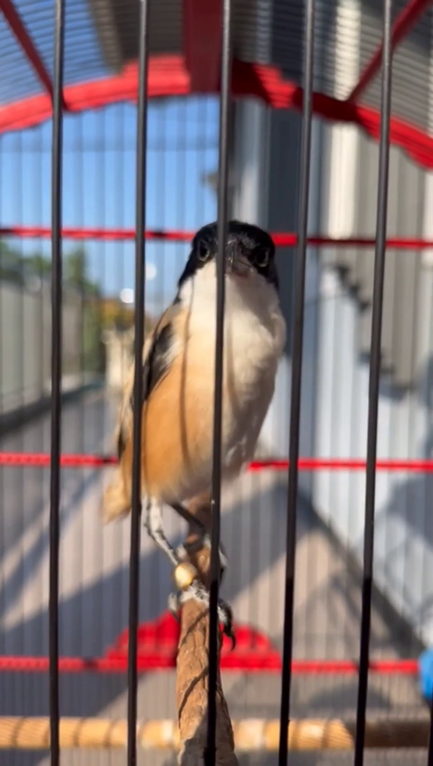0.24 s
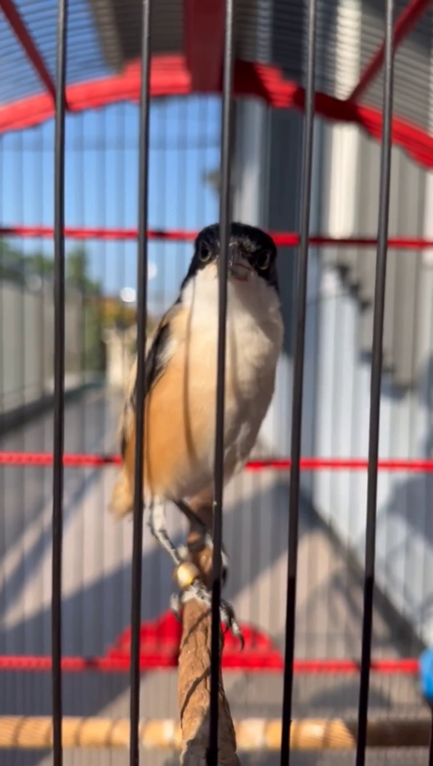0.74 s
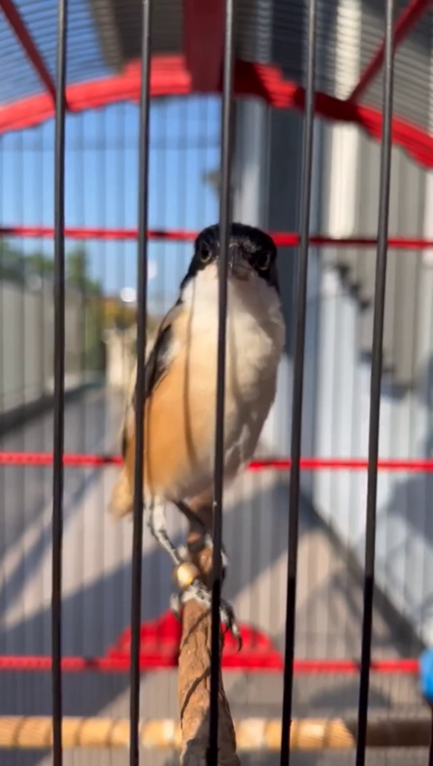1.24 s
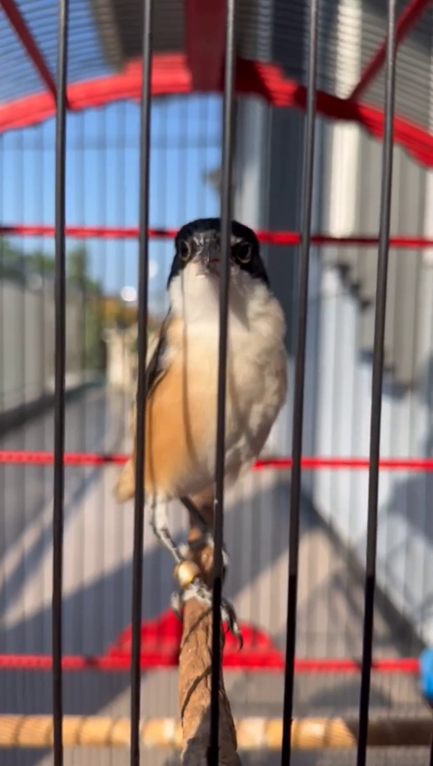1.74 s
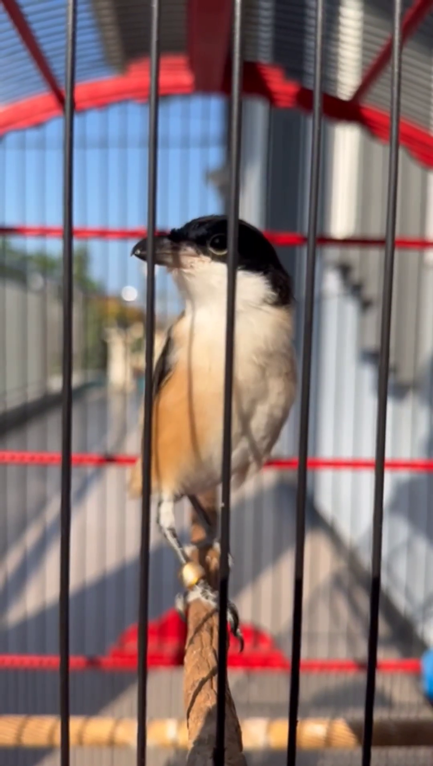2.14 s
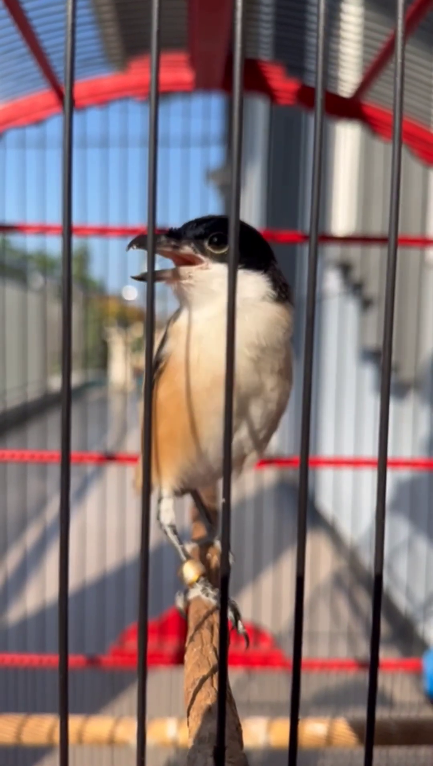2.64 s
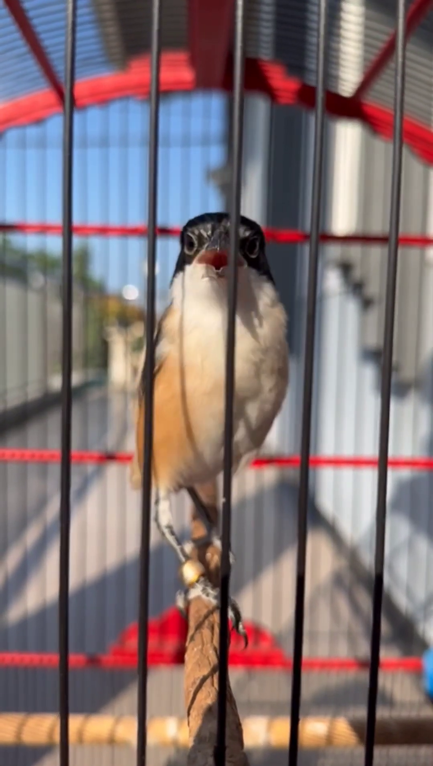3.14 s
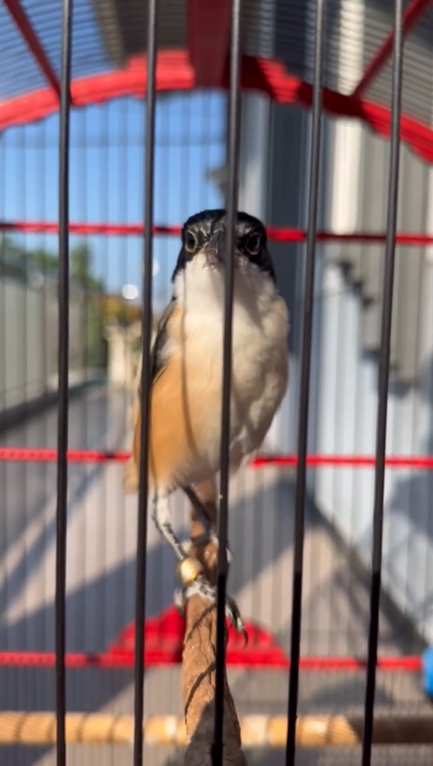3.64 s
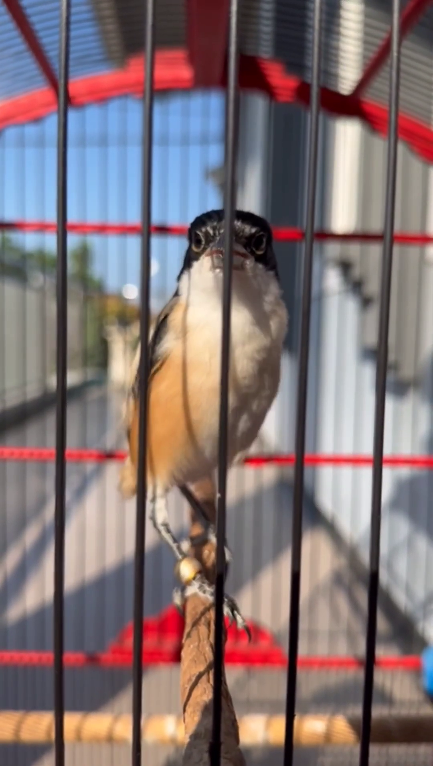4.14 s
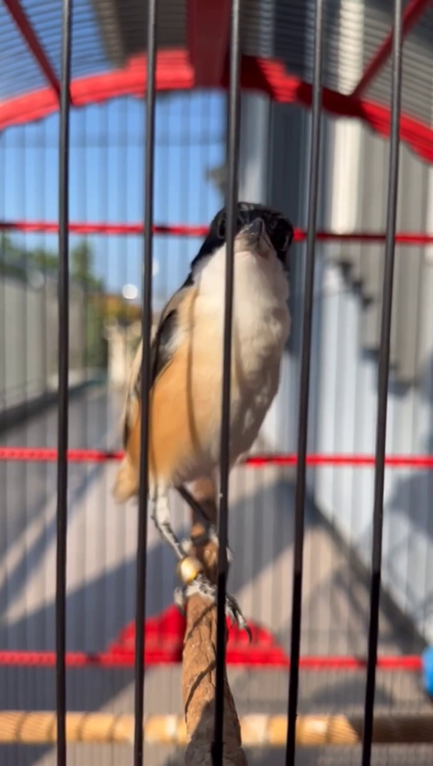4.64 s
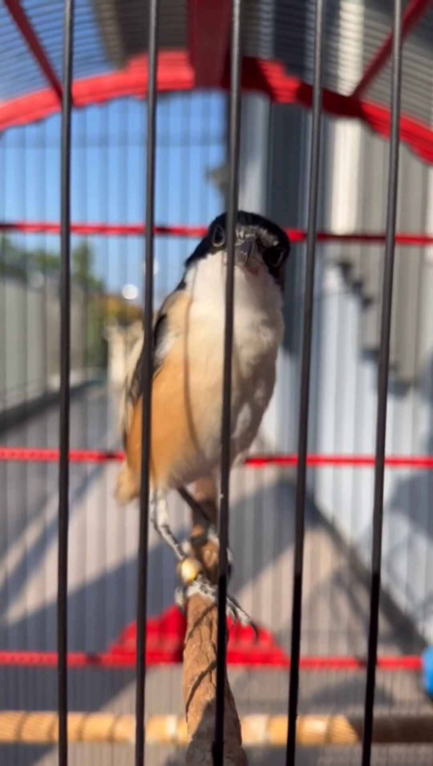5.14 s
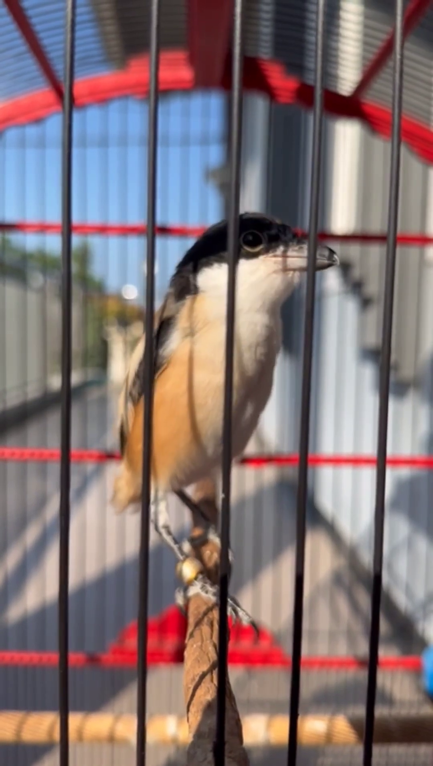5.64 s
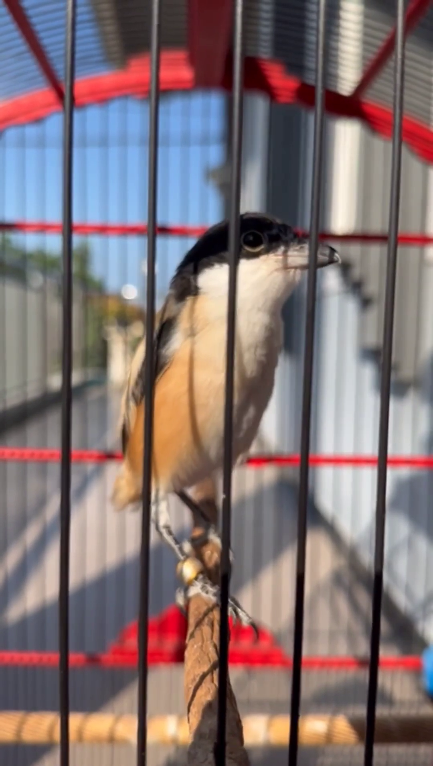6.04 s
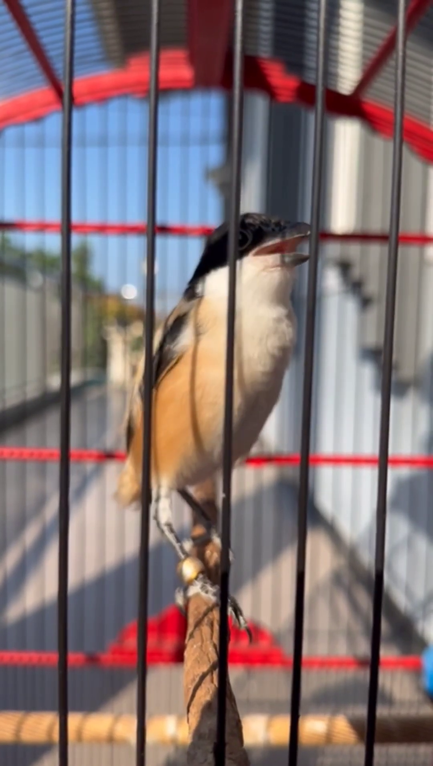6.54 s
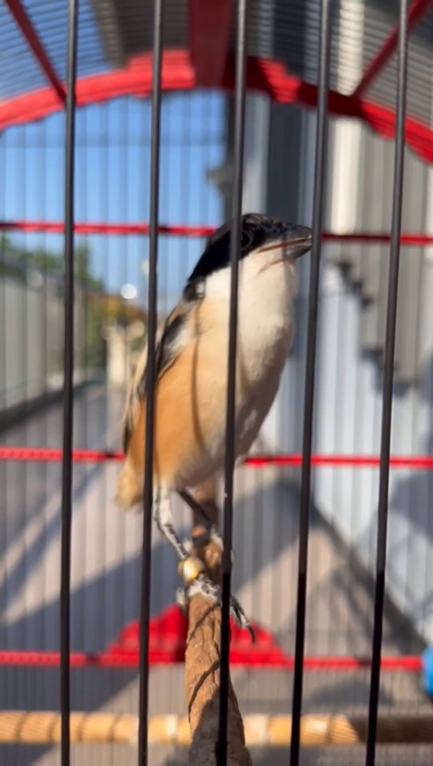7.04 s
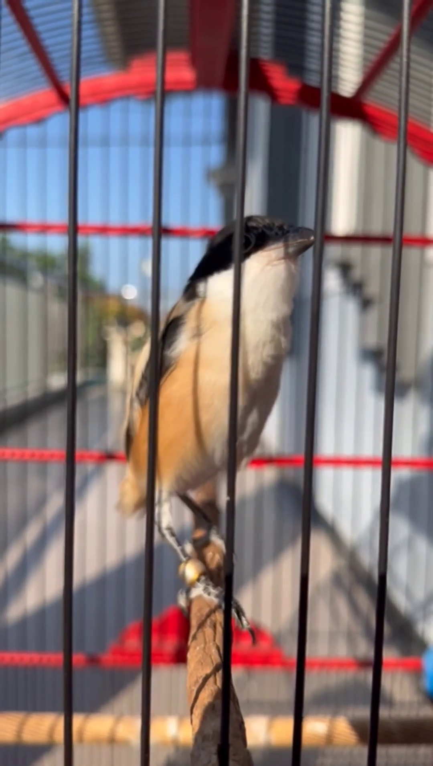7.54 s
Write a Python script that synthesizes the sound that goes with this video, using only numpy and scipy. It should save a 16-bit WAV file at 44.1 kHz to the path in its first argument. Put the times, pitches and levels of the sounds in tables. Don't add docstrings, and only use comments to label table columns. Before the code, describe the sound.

Loud, bright, scratchy chips and buzzy rasping notes from one perched songbird on a roof terrace, with distant traffic and faint far birds.

```python
import sys
import numpy as np
from scipy import signal
from scipy.fft import rfft, irfft, next_fast_len
from scipy.io import wavfile
from scipy.ndimage import uniform_filter1d

SR = 44100
rng = np.random.default_rng(int(sys.argv[2]) if len(sys.argv) > 2 else 0)


def waveform_to_disk(signal):
    frames = np.transpose(np.atleast_2d(signal))
    scaled = np.clip(frames, -1, 1) * 32767
    samples = np.round(scaled).astype(np.int16)
    wavfile.write(sys.argv[1], SR, samples)


def elevation(decibels):
    levels = np.asarray(decibels, float)
    return 10 ** (levels / 20)


N = 343980


def evened(x):
    return x / np.sqrt(np.mean(x ** 2) + 1e-20)


def read(points, hz):
    f, value = np.transpose(points)
    return np.interp(np.log(hz + 1), np.log(f + 1), value)


def colour(x, points):
    size = next_fast_len(x.shape[-1], True)
    gain = elevation(read(points, np.fft.rfftfreq(size, 1 / SR)))
    return irfft(rfft(x, size) * gain, size)[..., :x.shape[-1]]


def wander(chance, seconds):
    size = max(int(seconds * SR), 1)
    return evened(uniform_filter1d(uniform_filter1d(chance, size), size))


def add(mix, s, sound):
    sound = sound[max(-round(s * SR), 0):]
    part = mix[max(round(s * SR), 0):][:len(sound)]
    part += sound[:len(part)]


def traffic():
    # f/Hz, level/dB
    floor = [(25, -57), (45, -14.5), (65, 2), (115, -2), (160, -11), (650, -25), (950, -29.5), (3700, -40),
             (11000, -64.5)]
    # f/Hz, level/dB
    port_side = [(60, -41.5), (250, -20), (700, -12.5), (10000, -9)]
    # t/s, level/dB
    swell = [
        (0, -45),
        (.6, -47),
        (2.301, -47.5),
        (2.802, -42.5),
        (4.299, -44.5),
        (6.201, -46.5),
        (7.8, -46.5),
    ]
    frames, hz = N // 512 + 5, np.fft.rfftfreq(2048, 1 / SR)
    a, b, c, d, patches = rng.standard_normal((frames, 1025, 5)).T
    patches = evened(uniform_filter1d(uniform_filter1d(patches, 6, 0), 10, 1))
    level_db = np.interp(np.arange(frames) * 512 / SR, *np.transpose(swell))
    mean_db = level_db.mean()
    follow = read([(400, 1.0), (1500, 0.61)], hz)[:, None]
    z = np.array([a + 1j * b, (c + 1j * d) * elevation(read(port_side, hz))[:, None]])
    z *= elevation(read(floor, hz)[:, None] + 2.5 * patches + follow * (level_db - mean_db))
    x = signal.istft(z, nperseg=2048, noverlap=1536)[1][:, :N]
    return elevation(mean_db + 1.7) * x / np.sqrt(np.mean(x[0] ** 2))


def shaped(shape, start, length, hz, db):
    return [(start + share * length, ratio * hz, tone_db + db, rasp_db + db)
            for share, ratio, tone_db, rasp_db in shape]


def clear_tone(hz, rough, beak, a, b):
    # f/Hz, level/dB
    throat = [(700, -17), (1500, -9.5), (3300, 0), (4200, 3.5), (5100, -7), (5700, -7.5), (6400, -15),
              (12000, -23.5)]
    k = np.arange(1, 9)[:, None]
    upper = np.maximum(k - 2, 0)
    turns = np.cumsum(hz * (1 + 0.0078 * wander(a, 0.0019))) / SR
    slack = np.clip(.5 - np.gradient(np.log(hz)) * SR / 8, 0, 1)
    weights = elevation(read(throat, k * hz / beak) - (4.7 * rough + 3.2 * slack) * upper) * (k * hz < SR / 2)
    weights = weights / np.sqrt((weights ** 2).sum(0) / 2)
    flutter = elevation((1.92 + 2.3 * rough) * np.array([wander(v, 0.0013) for v in b]))
    blur = (0.072 + .5 * rough) * upper * np.array([wander(v[::-1], .0011) for v in b])
    patches = elevation(1.5 * np.minimum(upper, 2) * np.array([wander(v, .008) for v in b[::-1]]))
    return (weights * np.cos(2 * np.pi * (k * turns + a[-8:, None]) + blur) * flutter * patches).sum(0)


def chaotic_rasp(hz, beak, c, d):
    # f/Hz, level/dB
    ridges = [(700, -23.5), (1600, -25), (2600, 5), (3200, -7), (4100, 2.5), (5600, -13.5), (9000, -21),
              (10200, -41.5)]
    # f/Hz, level/dB
    beak_bright = [(2600, -10), (4500, -9.5), (6000, 33), (9000, 48), (11000, 62)]
    half_step_db, half_step_below_hz = -4.1, 1480
    k = np.arange(1, 9)[:, None]
    chaos = np.cumsum(hz * np.exp(.2 * np.tanh(wander(c, .0013)))) / SR
    beats = np.sin(2 * np.pi * (k * chaos + c[-8:, None])).sum(0) / 2
    if hz.max() < half_step_below_hz:
        half = np.cumsum(hz / 2 * (1 + 0.022 * wander(c[::-1], .002))) / SR
        halves = np.cos(2 * np.pi * ((2 * k - 1) * half + d[-8:, None])).sum(0) / 2
        beats = beats + elevation(half_step_db) * halves
    opened = [(f * beak ** (.6 * (f > 3000)), db) for f, db in ridges]
    tilt = [(f, db * (beak - 1)) for f, db in beak_bright]
    return evened(colour(colour(beats + .25 * d, opened), tilt) * elevation(2 * wander(d[::-1], .0008)))


def note(rows, beak):
    s, hz, tone_db, rasp_db = np.transpose(rows)
    t = np.arange(s[0], s[-1] + .009, 1 / SR)
    hz = uniform_filter1d(np.interp(t, s, hz), 60 + len(t) // 30)
    tone_size, rasp_size = (elevation(uniform_filter1d(np.interp(t, s, db), 60)) for db in (tone_db, rasp_db))
    a, c, d, *b = rng.standard_normal((11, len(t)))
    rough = rasp_size ** 2 / (tone_size ** 2 + rasp_size ** 2)
    sound = tone_size * clear_tone(hz, rough, beak, a, b) + rasp_size * chaotic_rasp(hz, beak, c, d)
    return s[0], sound * signal.windows.tukey(len(t), 700 / len(t))


def harsh_syllables():
    # share of length, pitch ratio, tone level/dB, rasp level/dB
    churr_shape = [(0, .65, -43, -22), (.19, .72, -13, -10.5), (.28, .995, -4.5, -18),
                   (.55, 1.005, -1.5, -22.5), (.63, 1.045, 0, -14), (.7, 1.02, -10, -4),
                   (.88, .9, -17.5, -7), (1, .8, -23.5, -17.5)]
    churr_arch_shape = [(0, .6, -36, -14.5), (.2, .75, -10.5, -13), (.3, .95, -1.5, -16),
                        (.5, 1.0, -2, -16), (.62, 1.06, -2, -8), (.85, 1.01, -4, -6), (1, .97, -14, -12.5)]
    churr_swell_shape = [(0, .65, -40, -25), (.2, .75, -14, -12), (.27, .98, -3, -11),
                         (.33, .99, -7.5, -19.5), (.6, 1.03, 0, -15.5), (.68, 1.05, -8, -5),
                         (.85, .9, -17.5, -9), (1, .8, -25, -18)]
    churr_burst_shape = [(0, .65, -36.5, -21), (.2, 0.89, -12, -12), (.32, 1, -4, -18.5),
                         (.53, 0.98, -7, -19.5), (.6, 1.04, 2, -11), (.68, 1.04, -9.5, -2.5),
                         (.88, 0.98, -16, -4.5), (1, 0.92, -25.5, -21)]
    arch_shape = [(0, 0.54, -26, -17.5), (.12, .58, -16.5, -13.5), (.2, .8, -5.5, -8.5),
                  (.33, .88, -6, -10), (.5, 0.98, 2.5, -4.5), (.78, .93, -10, -1), (1, .76, -8.5, -6.5)]
    long_arch_shape = [(0, 0.49, -35, -22.5), (.15, .65, -18.5, -12), (.2, .75, -6, -4.5),
                       (.26, .86, -10, -12.5), (.36, .9, -2.5, -12), (.48, 1.01, 0.5, -7.5),
                       (.75, .92, -10.5, -4.5), (1, .8, -7, -6)]
    step_shape = [(0, .6, -29, -19.5), (.13, .7, -20, -9), (.27, .86, -7.5, -2), (.4, .93, -4, -10.5),
                  (.6, 0.98, .5, -5), (.78, 0.98, -6, -0.5), (1, .78, -11.5, -5.5)]
    plateau_shape = [(0, .76, -19, -6.5), (.16, .94, -4.5, -1.5), (.35, 0.93, -1, -6), (.6, 0.97, -4.5, -8),
                     (.85, .9, -8.5, -3), (1, 0.85, -17, -15.5)]
    long_plateau_shape = [(0, .76, -18.5, -4.5), (.16, .92, -3.5, -3), (.33, 0.96, 1.5, -5.5),
                          (.6, 0.98, -3.5, -9), (.78, .93, -5, -11), (1, 0.89, -28, -22)]
    buzz_shape = [(0, .98, -3.5, 0), (.35, 1.02, -8, 0.5), (.8, .85, -9.5, -0.5), (1, .75, -14, -19.5)]
    warble_shape = [(0, 0.6, -26, -24.5), (.2, .88, -17.5, -24), (.5, 1.0, 0.5, -13.5), (.76, .9, -12, -18),
                    (1, 0.46, -25, -33)]
    ramp_shape = [(0, 0.5, -28, -18.5), (.2, .8, -9.5, -19), (.4, .93, -2, -11.5), (.54, 0.98, 0, -5),
                  (.75, 0.96, -9, -8.5), (1, .78, -35, -29.5)]
    dome_shape = [(0, .72, -47.5, -21), (.22, .89, -14, -23.5), (.52, 0.97, 1, -9.5), (.8, .98, -7.5, -10),
                  (1, 0.66, -30, -32)]
    # start t/s, length t/s, pitch f/Hz, level/dB, beak opening (ratio)
    churrs = [
        (0.458, 0.088, 1500, -14.5, 1.06),
        (5.882, 0.077, 1795, -18, 1.11),
        (7.094, 0.071, 1520, -18, 1.19),
    ]
    churr_arches = [(0.017, .068, 1474, -13.5, 1.094)]
    churr_swells = [(0.367, 0.086, 1683, -15, 0.99)]
    churr_bursts = [(.545, .075, 1437, -12, 1.147)]
    arches = [(6.928, .092, 1911, -22.5, 0.97), (7.62, .105, 1914, -21.5, 1.01)]
    long_arches = [(1.78, .132, 1954, -17, 0.94)]
    steps = [(6.153, .09, 1796, -24.5, 0.87)]
    plateaus = [(7.018, .085, 1790, -20, 0.93)]
    long_plateaus = [(6.241, .15, 1806, -24.5, 0.98)]
    buzzes = [
        (6.315, .07, 1560, -29, 1.24),
        (-.025, .06, 1420, -23, 1.01),
        (.071, 0.049, 1471, -23, 1.056),
        (1.913, 0.11, 1435, -22.5, 0.97),
        (7.727, 0.1, 1416, -25, 1.01),
    ]
    warbles = [(4.418, .082, 2184, -14, 1.055)]
    ramps = [(4.561, .082, 2098, -18.5, 1.055), (4.711, .075, 2170, -15.5, 1.01)]
    domes = [(5.007, 0.092, 2221, -16.5, 1.14), (5.207, 0.082, 2192, -18, 1.06),
             (5.456, 0.086, 2171, -16.5, 1.245), (5.693, 0.08, 2114, -15.5, 1.01)]
    sung = np.zeros(N)
    for shape, rows in ((churr_shape, churrs), (churr_arch_shape, churr_arches),
                        (churr_swell_shape, churr_swells), (churr_burst_shape, churr_bursts),
                        (step_shape, steps), (long_plateau_shape, long_plateaus),
                        (arch_shape, arches), (long_arch_shape, long_arches),
                        (plateau_shape, plateaus), (buzz_shape, buzzes),
                        (warble_shape, warbles), (ramp_shape, ramps), (dome_shape, domes)):
        for *syllable, beak in rows:
            add(sung, *note(shaped(shape, *syllable), beak))
    return sung


def walls(x):
    # f/Hz, t60 t/s
    decay = [(1500, 0.34), (4400, 0.29), (7000, 0.43), (10000, 0.29)]
    # f/Hz, level/dB
    near_wall = [(2500, 2.5), (5000, -1.5), (7000, 3.5), (9500, 0)]
    taps = np.zeros((2, SR))
    at = np.arange(260, SR - 20, 20) + rng.integers(0, 20, (2, (SR - 261) // 20))
    np.put_along_axis(taps, at, rng.choice([-1., 1.], at.shape), 1)
    hz, t, z = signal.stft(taps, SR, nperseg=256)
    quick = elevation(read(near_wall, hz)[:, None] - 60 * t / 0.083)
    late = elevation(-14.5 - 60 * t / read(decay, hz)[:, None])
    tail = signal.istft(z * (quick + late), SR, nperseg=256)[1]
    return signal.fftconvolve(x[None], tail / np.linalg.norm(tail[0]), axes=1)[:, :N]


def fuzzy_tones(rows):
    out = np.zeros(N)
    for s, length, start_hz, end_hz, width, db in rows:
        size = int(length * SR)
        a, b = rng.standard_normal((2, size))
        fuzz = wander(a, 0.51 / width) + 1j * wander(b, 0.51 / width)
        turns = np.cumsum(np.linspace(start_hz, end_hz, size)) / SR
        tone = (fuzz * np.exp(2j * np.pi * turns)).real
        add(out, s, elevation(db) * tone * signal.windows.tukey(size, .6))
    return out


def far_birds():
    # start t/s, length t/s, start f/Hz, end f/Hz, bandwidth f/Hz, level/dB
    calls = [
        (0.191, .045, 1200, 1107, 150, -60),
        (4.318, 0.033, 1300, 1300, 120, -56),
        (6.62, 0.24, 2840, 2866, 130, -58.5),
        (6.83, 0.22, 3530, 4290, 735, -56.5),
        (7.17, .13, 3346, 3200, 400, -52.5),
        (7.35, 0.23, 3260, 3080, 171, -52),
        (7.501, 0.18, 5970, 5620, 3330, -56),
    ]
    return fuzzy_tones(calls)


def chips():
    # share of length, pitch ratio, tone level/dB, rasp level/dB
    flat_shape = [(0, .76, -46, -24), (.3, .84, -24.5, -22), (.45, 1.0, -7.5, -20), (.9, 1.0, -3, -15),
                  (1, 1.0, -6.5, -10.5)]
    cap_shape = [(0, .74, -30.5, -26), (.3, 0.92, -9, -16.5), (.5, 0.98, -1, -14.5), (.8, .98, -2, -14),
                 (1, .84, -9.5, -14)]
    rise_shape = [(0, .78, -45.5, -32), (.3, .85, -16, -23.5), (.5, .93, -4.5, -23), (.82, 1.0, -2, -17.5),
                  (1, 0.89, -13, -7)]
    sag_shape = [(0, 1.03, -34, -34), (.28, 1.03, -9.5, -16.5), (.7, 1.0, -1, -12), (1, .88, -10.5, -7)]
    level_shape = [(0, 1.01, -30, -32), (.18, 1.01, -7.5, -19), (.7, 1.0, -2, -13), (.85, .97, -5.5, -8.5),
                   (1, .85, -11, -6.5)]
    drop_shape = [(0, 2, -38, -31), (.3, 1.4, -8, -20), (.68, 1.15, -1, -2), (.88, 1.02, -1, -10),
                  (1, 1.0, -15, -10)]
    # start t/s, pitch f/Hz, level/dB, beak opening (ratio)
    flats = [(0.736, 2192, -7, 1.47), (1.186, 2207, -8, 1.44)]
    caps = [(6.56, 2408, -15.5, 1.38), (7.295, 2374, -18.5, 1.5)]
    rises = [(.961, 2265, -7, 1.49), (1.411, 2280, -7.5, 1.49), (2.201, 2439, -12, 1.38),
             (2.663, 2527, -10, 1.43), (2.912, 2596, -10.5, 1.45)]
    sags = [(4.16, 2500, -11, 1.327)]
    levels = [(2.446, 2500, -11.5, 1.5)]
    drops = [(3.17, 2375, -11, 1.57), (3.317, 2380, -12.5, 1.51), (3.461, 2508, -15.5, 1.24),
             (3.615, 2160, -18.5, 1.13), (3.809, 2172, -15, 1.26), (3.97, 2159, -17, 1.34)]
    # share of length, pitch ratio, tone level/dB, rasp level/dB
    leap_shape = [(.13, 0.93, 2, -3.5), (.32, 0.99, -2.5, -6.5), (.55, 0.57, -21, -10.5),
                  (1, 0.57, -39.5, -26.5)]
    spike_shape = [(.3, 1.0, -16.5, 1.5), (.68, .55, -15.5, -6.5), (1, .55, -40, -21.5)]
    hook_shape = [(.12, 1.03, -2, -12.5), (.3, 1.0, 1.5, -16), (.62, .98, -6, -26), (.8, .93, -17, -27.5),
                  (1, 0.74, -40, -37)]
    wobble_shape = [(.14, 1.02, -1.5, -3.5), (.28, .98, -1, -6), (.4, .82, -13, -6), (.58, 1.04, -10, -9),
                    (1, .75, -37.5, -23)]
    # start t/s, length t/s, pitch f/Hz, level/dB
    leaps = [(0.77, 0.036, 3063, -13.5), (1.221, 0.034, 3074, -14), (2.237, 0.035, 3195, -16),
             (6.592, .035, 3028, -20), (7.332, .03, 2682, -26)]
    spikes = [(.993, 0.027, 3583, -10.5), (1.442, .03, 3725, -13.5)]
    hooks = [(2.686, 0.017, 3968, -16), (2.943, 0.028, 4410, -11.5), (3.196, 0.027, 4787, -12),
             (3.338, 0.026, 4893, -9.5), (3.486, 0.023, 4235, -10), (3.639, 0.02, 4076, -11.5),
             (3.834, 0.031, 4450, -11), (3.995, .022, 4376, -10.5), (4.189, 0.034, 4483, -13.5)]
    wobbles = [(2.47, .033, 3984, -12.5), (2.695, .03, 4000, -11.5)]
    longest_opening_s = .06
    kinds = ((leap_shape, leaps), (spike_shape, spikes), (hook_shape, hooks), (wobble_shape, wobbles))
    endings = [(row, shape) for shape, rows in kinds for row in rows]
    sung = np.zeros(N)
    for shape, rows in ((flat_shape, flats), (cap_shape, caps), (rise_shape, rises),
                        (sag_shape, sags), (level_shape, levels), (drop_shape, drops)):
        for start, hz, db, beak in rows:
            mine = sorted(e for e in endings if 0 < e[0][0] - start < longest_opening_s)
            first_ending = mine[0][0][0]
            chip = shaped(shape, start, first_ending - start, hz, db)
            for row, end_shape in mine:
                chip = chip + shaped(end_shape, *row)
            add(sung, *note(sorted(chip), beak))
    return sung


def other_side():
    # share of length, pitch ratio, tone level/dB, rasp level/dB
    duet_shape = [(0, 0.9, -5, -22), (.35, .98, 0, -11.5), (.7, 1.08, -5, -13), (1, 1.12, -20, -44)]
    flick_shape = [(0, 0.85, -8.5, -25), (.4, .9, -2.5, -19), (.7, 1.08, -1, -15.5), (1, 1.12, -13.5, -42)]
    bow_shape = [(0, .86, -8.5, -24), (.35, .98, -1.5, -16), (.55, 1.02, .5, -12), (.75, .97, -7.5, -12),
                 (1, .88, -8.5, -24)]
    undertone_shape = [(0, 0.97, -13, -24), (.15, 1.05, -4, -20), (.5, 1, -4.5, -24),
                       (1, .76, -10.5, -33.5)]
    # start t/s, length t/s, pitch f/Hz, level/dB
    duets = [(4.6, 0.042, 2590, -18), (4.74, .049, 2552, -19), (5.738, .04, 2743, -17.5)]
    flicks = [(5.05, .033, 2968, -18), (5.498, .028, 2890, -18.5)]
    bows = [(4.452, .03, 2750, -17.5), (5.247, .04, 2724, -16.5)]
    peeps = [(4.565, .018, 2700, -32.5), (5.018, .018, 2900, -36), (5.218, .018, 2900, -35.5),
             (5.472, .018, 2900, -35.5), (5.71, .016, 2900, -38.5)]
    undertones = [(1.836, 0.15, 1040, -43.5), (6.275, 0.091, 1230, -44), (6.984, 0.086, 1339, -45.5),
                  (7.66, 0.13, 1146, -47)]
    other, beating = np.zeros((2, N))
    for shape, rows, beak, beat_db in ((duet_shape, duets, .7, 14), (flick_shape, flicks, .7, 14),
                                       (bow_shape, bows, .7, 14), (bow_shape, peeps, .7, 26),
                                       (undertone_shape, undertones, .3, 26.5)):
        for row in rows:
            s, sound = note(shaped(shape, *row), beak)
            add(other, s, sound)
            add(beating, s, elevation(beat_db) * sound)
    return other, beating


def bird():
    # f/Hz, level/dB
    sum_tones = [(1300, -28.5), (2600, -6.5), (5000, 3.5), (8000, -21)]
    main = harsh_syllables() + chips()
    other, beating = other_side()
    return main + other + colour(main * beating, sum_tones)


def engine():
    # t/s, f/Hz, level/dB
    passing = [
        (2.3, 168.6, -77),
        (2.8, 166.3, -57),
        (3.399, 155.9, -59),
        (4.399, 169.8, -69),
        (5.398, 175.8, -67.5),
    ]
    # multiple of the firing rate, level/dB
    engine_orders = [(2, 1), (3, -1), (4, -.5)]
    s, hz, db = np.transpose(passing)
    t = np.arange(N) / SR
    turns = np.cumsum(np.interp(t, s, hz) * (1 + 0.0069 * wander(rng.standard_normal(N), 0.018))) / SR
    orders = np.zeros(N)
    for k, order_db in engine_orders:
        waver_db = 3.7 * wander(rng.standard_normal(N), 0.03)
        orders += elevation(order_db + waver_db) * np.cos(2 * np.pi * k * turns)
    return elevation(np.interp(t, s, db, -120, -120)) * orders


def far_motors():
    # start t/s, length t/s, start f/Hz, end f/Hz, bandwidth f/Hz, level/dB
    drones = [
        (2.45, .55, 335, 325, 14, -57),
        (4.75, .75, 215, 230, 14, -58),
    ]
    return fuzzy_tones(drones)


def scene():
    # f/Hz, level/dB
    mic = [(2800, -1.5), (3150, -7), (3500, 1), (6100, -0.5), (6500, -8.5), (6900, 1.5), (9400, -7.5),
           (10300, -21), (12500, -28.5)]
    # f/Hz, level/dB
    spacing = [(1900, -21.5), (2600, -5), (4700, -10.5), (5400, -21.5), (6200, -10), (8000, 0), (11000, 11)]
    # f/Hz, level/dB
    scatter = [(2000, -27.5), (2600, -12), (4800, -9.5), (5500, -25), (9000, 0.5), (11000, 1.5)]
    rumble = traffic()
    song = bird()
    wet = elevation(-17.5) * walls(song)
    middle = colour(song + wet[0] + far_birds() + far_motors(), mic) + engine()
    case = evened(rng.standard_normal(300) * elevation(-np.arange(300) / 40)) / np.sqrt(300)
    scattered = signal.oaconvolve(middle, case)[:N] + colour(wet[1], mic)
    quarter_turn = signal.hilbert(middle).imag
    side = colour(quarter_turn, spacing) + colour(scattered, scatter) + rumble[1]
    middle = middle + rumble[0]
    return np.array([middle + side, middle - side])


def band_limit(x):
    return signal.sosfilt(signal.butter(12, 12540, fs=SR, output="sos"), x)


def record(dry):
    # start t/s, end t/s
    dropout = (1.0705, 1.1165)
    t = np.arange(N) / SR
    bent = np.sign(dry) * (.5 + .42 * np.tanh((abs(dry) - .5) / .42))
    limited = np.where(abs(dry) < .5, dry, bent)
    gate = uniform_filter1d(1. - (t > dropout[0]) * (t < dropout[1]), 40)
    return band_limit(limited * gate)


dry = scene()
out = record(dry)
waveform_to_disk(out)
```